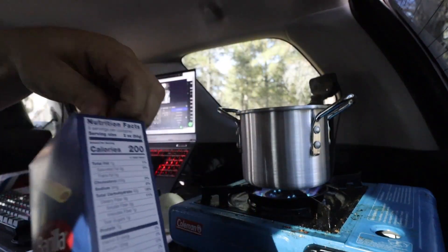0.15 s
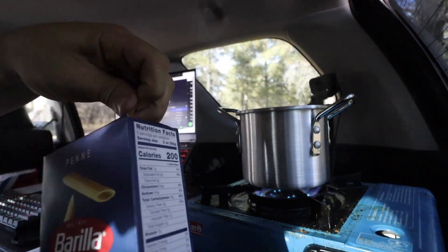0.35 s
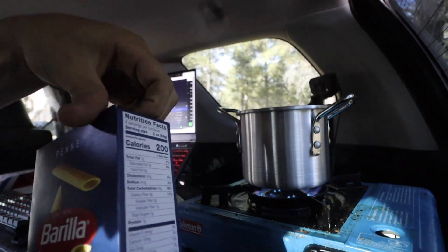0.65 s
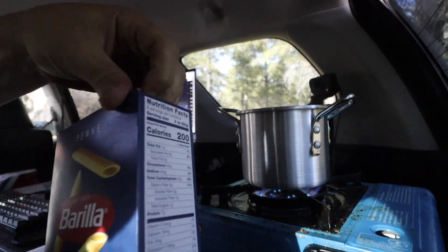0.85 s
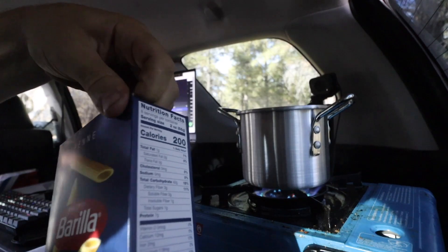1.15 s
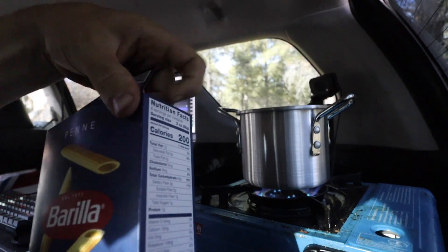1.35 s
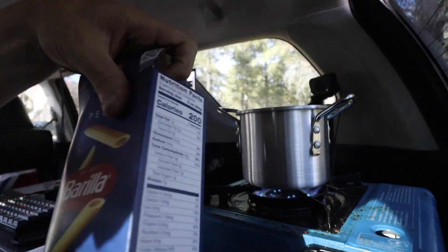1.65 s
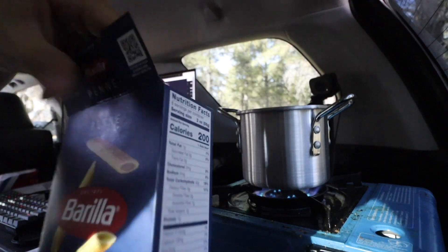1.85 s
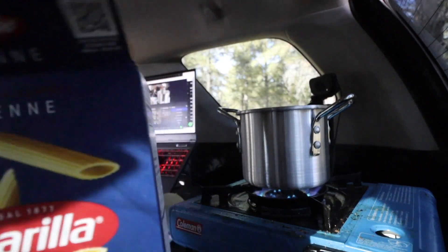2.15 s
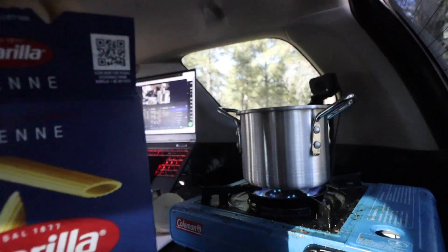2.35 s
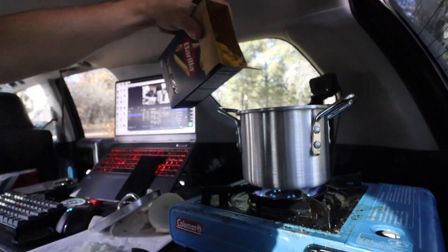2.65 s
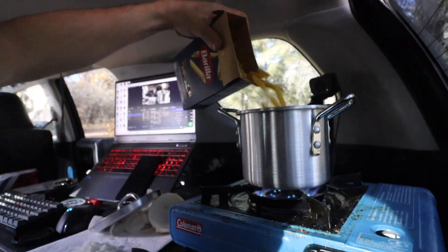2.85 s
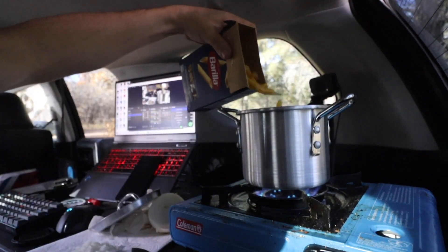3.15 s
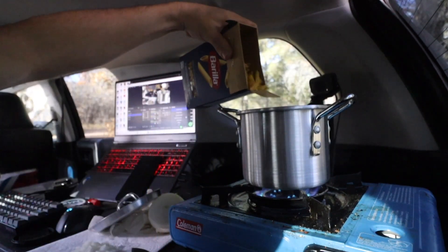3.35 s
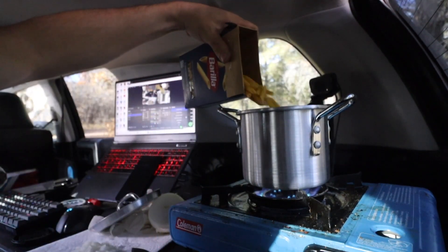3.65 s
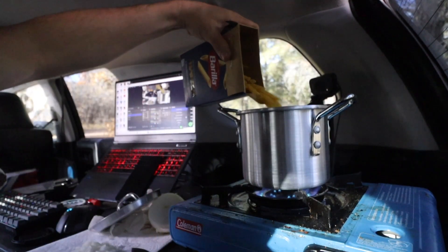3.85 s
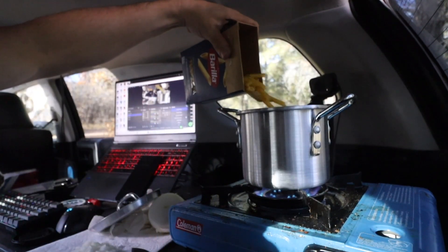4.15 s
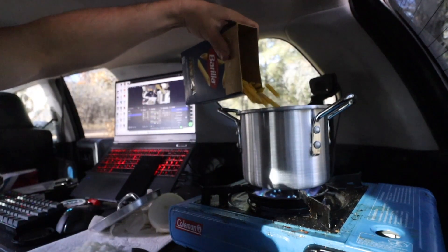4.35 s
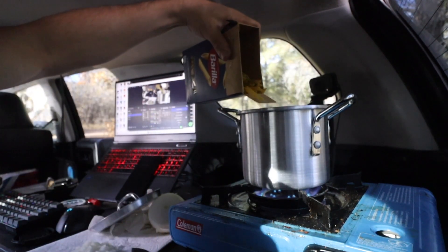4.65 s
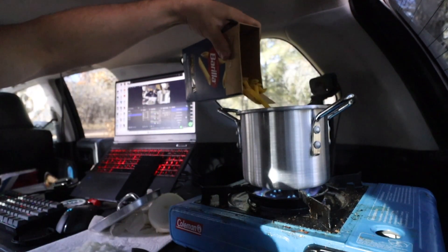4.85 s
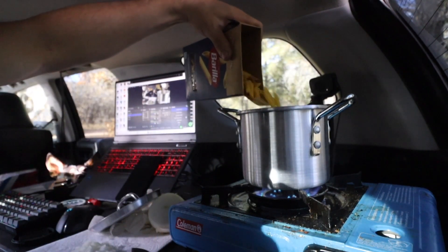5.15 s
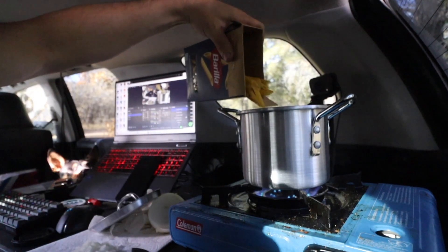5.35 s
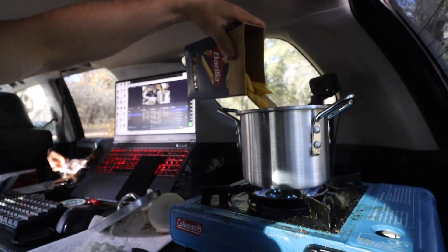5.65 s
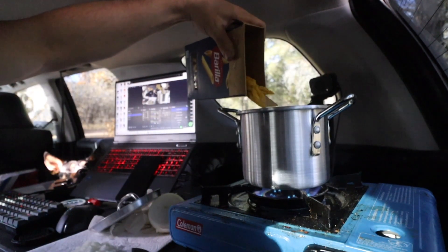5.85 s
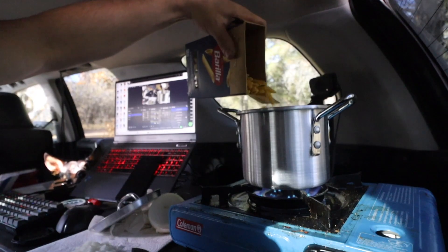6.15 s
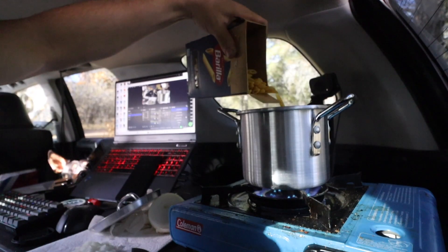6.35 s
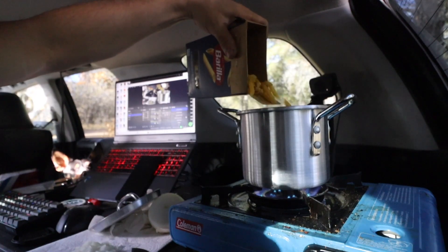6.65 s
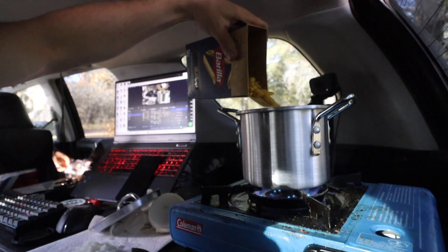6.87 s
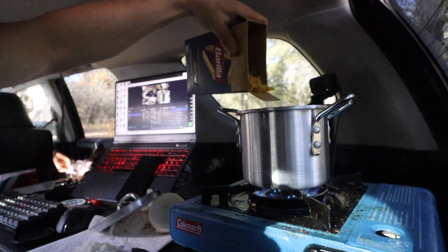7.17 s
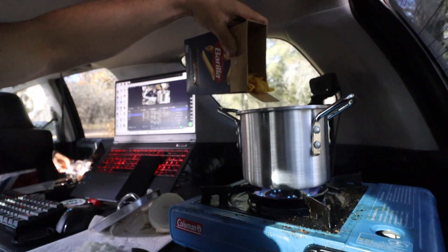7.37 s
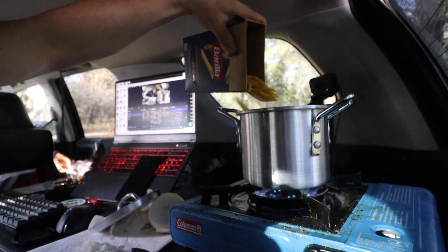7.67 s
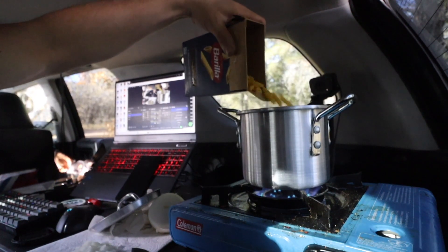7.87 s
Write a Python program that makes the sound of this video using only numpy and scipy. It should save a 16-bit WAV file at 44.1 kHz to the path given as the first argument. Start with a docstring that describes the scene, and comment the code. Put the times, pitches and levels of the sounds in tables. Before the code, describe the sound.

First comes loud, close handling of a card box: scuffs, crackly tears, crisp pops and boxy thuds. Then hard dry tubes pour in uneven surges, rattling and ticking, the box sounding more hollow as space opens, with small knocks and plops as pieces drop. The flow thins near the end, then surges again. Soft burner hiss and faint deep hum continue throughout in a dry, small car interior.

```python
"""A gas burner hisses under a pot and a low hum fills a parked car: noise and slowly wavering tones.
First a hand rubs, tears and snaps a cardboard box open: shaped noise coloured by the card and its walls.
Then dry pasta tubes slide out and click, drum on the box and drop: short decaying tones and noise puffs.
Soon after the tubes start, three blows ring the rim of the steel pot.
The padded cabin adds a short echo; the recorder turns down after loud sounds and rounds off the peaks."""
import sys
import numpy as np
from scipy import signal
from scipy.fft import rfft, irfft, next_fast_len
from scipy.io import wavfile
from scipy.ndimage import uniform_filter1d, map_coordinates

SR = 44100
rng = np.random.default_rng(int(sys.argv[2]) if len(sys.argv) > 2 else 0)


def generate_wav(signal):
    """Clip the signal to [-1, 1] and save it as 16-bit WAV at the path in sys.argv[1]."""
    frames = np.transpose(np.atleast_2d(signal))
    scaled = np.clip(frames, -1, 1) * 32767
    pcm = np.round(scaled).astype(np.int16)
    wavfile.write(sys.argv[1], SR, pcm)


N = 353241  # length in samples, about 8 s


def amp(db):
    """Turn decibels into a plain gain."""
    return 10 ** (np.asarray(db) / 20)


def unit(x):
    """Scale a sound to an rms of 1."""
    return x / np.sqrt(np.mean(x ** 2) + 1e-20)


def seconds():
    """The time of every sample."""
    return np.arange(N) / SR


def along(points, hz):
    """Read a curve of (pitch_hz, value) points, evenly spaced in octaves."""
    point_hz, value = np.transpose(points)
    return np.interp(np.log(hz + 1), np.log(point_hz + 1), value)


def wobble(rate):
    """A smooth random curve with this many random points a second."""
    points = rng.standard_normal(int(N * rate / SR) + 4)
    return map_coordinates(points, [np.arange(N) * rate / SR])


def filtered(x, response):
    """Change each frequency of x by a (possibly complex) response."""
    size = next_fast_len(N + SR // 2)
    return irfft(rfft(x, size) * response(np.fft.rfftfreq(size, 1 / SR)), size)[..., :N]


def colored_noise(points):
    """Steady noise with the colour of (pitch_hz, level_db) points, rms 1."""
    return unit(filtered(rng.standard_normal(N), lambda hz: amp(along(points, hz))))


def colored(x, points):
    """Colour x as a struck surface would: the filter starts at once (minimum phase) and has energy 1."""
    size = 2048
    log_gain = np.log(amp(along(points, np.fft.rfftfreq(size, 1 / SR))) + 1e-5)
    cepstrum = irfft(log_gain)
    # folding the second half onto the first leaves nothing before the start
    cepstrum = cepstrum * np.r_[1, 2 * np.ones(size // 2 - 1), 1, np.zeros(size // 2 - 1)]
    h = irfft(np.exp(rfft(cepstrum)))
    return signal.fftconvolve(x, h / np.linalg.norm(h))[:N]


def grit(rate, spread_db, bed):
    """Random contacts, rate a second and of uneven strength, over a share of smooth noise; rms 1."""
    strength = amp(spread_db * np.clip(rng.standard_normal(N), -2, 2))
    hits = (rng.random(N) < rate / SR) * strength * rng.standard_normal(N)
    return unit(unit(hits) + bed * rng.standard_normal(N))


def placed(times, rows):
    """Add up short sounds, one row each, starting at their times."""
    at = np.round(times * SR).astype(int)[:, None] + np.arange(rows.shape[1])
    return np.bincount(at.ravel(), rows.ravel(), N + SR)[:N]


def bursts(times, level_db, t60, rise):
    """A puff of noise at each time: it rises in about rise seconds and falls 60 dB in t60 seconds."""
    t = np.arange(SR // 8) / SR
    shape = amp(-60 * t / t60) * (1 - np.exp(-t / rise))
    noise = rng.standard_normal((len(times), len(t)))
    return placed(times, amp(level_db)[:, None] * shape / shape.max() * noise)


def bright_edge(x):
    """The sample-to-sample change, which favours the treble."""
    return np.diff(x, prepend=0)


def tones(times, level_db, hz, t60):
    """One fading tone at each time, each at its own pitch."""
    t = np.arange(SR // 20) / SR
    fade = amp(level_db[:, None] - 60 * t / t60)
    return placed(times, fade * np.sin(2 * np.pi * hz[:, None] * t))


def blows(times, level_db, modes, detune, scatter_db, size):
    """Blows that ring several fading tones; each tone's pitch and strength vary from blow to blow."""
    t = np.arange(size) / SR
    draw = rng.standard_normal((len(times), len(modes), 2))
    rows = 0
    for k, (hz, db, t60) in enumerate(modes):
        fade = amp(db + scatter_db * draw[:, k, :1] - 60 * t / t60)
        pitch = hz * np.exp(detune * draw[:, k, 1:])
        rows = rows + fade * np.sin(2 * np.pi * pitch * t)
    return placed(times, amp(level_db)[:, None] * rows)


# Colour of the burner's hiss: pitch_hz, level_db (per Hz, relative)
BURNER_COLOR = [(120, -50), (200, -3), (409, -3), (696, -1), (777, -1.5), (2290, -8), (6280, -18.5),
                (8740, -17), (13300, -30), (16000, -35)]


def burner():
    """Gas rushing out of the burner makes a hiss whose level wavers a little."""
    waver_db = 1.5 * wobble(3.75)
    return amp(-37.0 + waver_db) * colored_noise(BURNER_COLOR)


# Low hum and the air rumble that comes with it: time_s, hum_level_db, rumble_level_db (before wavering)
HUM_LEVELS = [(0, -45.5, -51), (2.6, -46.5, -40.5), (3, -47.5, -48), (4.6, -51.5, -50), (5.1, -46.5, -44),
              (6.3, -42.5, -46), (7.3, -41.5, -44), (7.6, -44, -42)]
# Colour of the air rumble: pitch_hz, level_db (per Hz, relative)
RUMBLE_COLOR = [(30, -20), (52, -5.5), (120, 3.5), (240, -3.5), (420, -30)]


def hum_and_rumble():
    """An unsteady low tone and a tone at three times its pitch, with a rumble of air noise."""
    time_s, *columns = np.transpose(HUM_LEVELS)
    hum_db, rumble_db = (np.interp(seconds(), time_s, c) for c in columns)
    pitch_hz = 38.6 + 0.6 * wobble(4.54)
    phase = 2 * np.pi * np.cumsum(pitch_hz) / SR
    # the higher tone fades faster than the hum
    third_db = -12.5 + 1.4 * (hum_db - hum_db.max()) + 3 * wobble(4)
    third = amp(third_db) * np.sin(3 * phase)
    hum = amp(hum_db + 0.65 * wobble(5.4)) * np.sqrt(2) * (np.sin(phase) + third)
    return hum + amp(rumble_db + 3.3 * wobble(6.2)) * colored_noise(RUMBLE_COLOR)


# How fast the cabin's echo dies away: pitch_hz, t60_s (time to fall 60 dB)
CABIN_DECAY = [(200, 0.12), (2000, 0.092), (12000, 0.085)]


def cabin(x):
    """The short echo of a padded cabin: fading noise, drawn anew every eighth of a second."""
    out, step = np.zeros(N + SR), SR // 8
    for at in range(0, N, step):
        hz, t, noise = signal.stft(rng.standard_normal(SR // 6), SR, nperseg=128)
        fade = amp(-60 * t / along(CABIN_DECAY, hz)[:, None])
        tail = signal.istft(noise * fade, SR, nperseg=128)[1]
        echo = signal.fftconvolve(x[at:at + step], tail / np.linalg.norm(tail))
        out[at + 60:][:len(echo)] += echo  # starts 60 samples late
    return out[:N]


# Colour of dry fibres cracking: pitch_hz, level_db (per Hz, relative)
CRACK_COLOR = [(1200, -15), (2000, -8.5), (3800, -0.5), (5900, 0), (8400, -3.5), (12500, -12), (16000, -15)]


def crackling(x):
    """Give x the bright colour of dry material cracking."""
    return colored(x, CRACK_COLOR)


def strokes(rows, pointed):
    """Gain of strokes that swell and fade; a larger pointed makes a sharper middle."""
    t, out = seconds(), 0
    for start_s, length_s, level_db in rows:
        progress = np.clip((t - start_s) / length_s, 0, 1)
        out = out + amp(level_db) * np.sin(np.pi * progress) ** pointed
    return out


# Fingers rubbing along the card: start_s, length_s, level_db (at the middle, before flutter and colour)
RUB_STROKES = [(.08, 0.18, -16), (.27, .1, -43), (.57, 0.084, -22.5), (.68, 0.075, -30.5),
               (1.16, 0.095, -37), (1.395, 0.11, -22), (1.48, .12, -23), (1.675, 0.13, -16),
               (1.79, 0.15, -19), (1.92, .12, -24), (2.135, 0.2, -23.5), (2.4, 0.22, -29.5)]
# Glued flaps tearing apart: start_s, length_s, level_db (at the middle, before flutter and colour)
TEAR_STROKES = [(0, 0.022, -31), (.355, .08, -25), (.43, 0.078, -40.5), (.935, 0.059, -30),
                (1.02, .067, -38), (1.085, 0.046, -23), (1.235, 0.082, -23), (1.30, 0.082, -33),
                (1.60, 0.093, -19), (2.515, 0.053, -34)]
# Card snapping: start_s, crack_level_db, wall_knock_level_db (before colour)
CARD_SNAPS = [(0.0857, -28, -23), (0.1446, -39, -7), (0.165, -39, -8.5), (0.1863, -41, -6.5),
              (0.2572, -5.5, -1), (0.2632, -14, -11), (.3775, -14, -42), (0.5563, -20, -27),
              (.6054, -37, -25), (0.786, -4, -7.5), (0.947, -35, -20.5), (0.9659, -17, -23),
              (0.9746, -8.5, -10.5), (0.9821, -8, -12.5), (1.088, -8.5, -19), (1.1128, -6, -33),
              (1.1172, 3.5, -3), (1.1359, -10, -8), (1.2627, -4, -2.5), (1.2744, -7, -10.5),
              (1.3045, -10, -3.5), (1.3274, -16, -22), (1.4101, -29, -14.5), (1.4432, -14.5, -36),
              (1.6372, -7, -4), (1.6455, -1.5, -3), (1.709, -12.5, -5), (1.7697, -22, -11),
              (1.823, -30, -17), (1.8532, -22, -7), (1.9044, -25, -12), (1.9959, -43, -16), (2.034, -25, 0),
              (2.141, -29.5, -18), (2.192, -21, -33), (2.2613, -40, -17), (2.358, -23, -25),
              (2.384, -14, -6), (2.4206, -32, -10.5), (2.5433, -1.5, 1)]
# Blows that flex the whole box: start_s, level_db (before colour)
BOX_THUMPS = [(0.376, -25.5), (.6054, -27), (0.7032, -20), (1.2611, -12.5), (1.8532, -36), (1.9043, -26),
              (1.9966, -19.5), (2.034, -6.5), (2.1925, -23), (2.262, -13), (2.279, -26), (2.384, -11.5),
              (2.4207, -18)]
# Colour of the closed box walls: pitch_hz, level_db (per Hz, relative)
WALL_COLOR = [(120, -28.5), (350, -4.5), (600, -8), (950, -2), (1700, -4.5), (3000, -16), (5000, -29),
              (12000, -70)]
# Colour of the whole box flexing: pitch_hz, level_db (per Hz, relative)
THUD_COLOR = [(70, -26), (130, -9), (280, 7.5), (450, -5), (900, -46.5)]


def card():
    """Rubbing drums the box walls, tearing crackles, and each snap cracks, knocks and thuds at once."""
    rubs, tears = strokes(RUB_STROKES, pointed=0.59), strokes(TEAR_STROKES, pointed=0.89)
    # faint, uneven rubbing of the hand on the box goes on until 3.4 s, under the first tubes
    rubs = rubs + amp(-43.5 + wobble(13)) * (seconds() < 3.4)
    # a tear also drums the walls, and a rub also crackles
    rub_gain = (rubs + tears) * amp(1.85 * wobble(60))
    tear_gain = (tears + amp(-18) * rubs) * amp(3.5 * wobble(90))
    rub = rub_gain * grit(800, spread_db=3.0, bed=0.5)
    tear = tear_gain * grit(2000, spread_db=6.5, bed=0.5)

    snap_s, crack_db, knock_db = np.transpose(CARD_SNAPS)
    thump_s, thump_db = np.transpose(BOX_THUMPS)
    knocks = bursts(snap_s, knock_db, t60=0.022, rise=0.0011)
    cracks = bursts(snap_s, crack_db, t60=0.016, rise=0.00035)
    thud_s, thud_db = np.r_[snap_s, thump_s], np.r_[knock_db - 28, thump_db]
    thuds = bursts(thud_s, thud_db, t60=0.028, rise=0.0021)
    edges = bright_edge(bursts(snap_s, crack_db - 18, t60=0.0027, rise=0.0001))

    walls = colored(rub + knocks, WALL_COLOR)
    flexing = colored(amp(-15.5) * rub + thuds, THUD_COLOR)
    return walls + crackling(tear + cracks) + edges + flexing


def resonances(modes):
    """Response of air that rings at several pitches, with alternating signs."""
    def response(f):
        total = 0
        for k, (center, width, db) in enumerate(modes):
            peak = 1j * f * width / (center * center - f * f + 1j * f * width)
            total = total + (-1) ** k * amp(db) * peak
        return total
    return response


# Air in the packed box, less of it and so higher: pitch_hz, width_hz, level_db
PACKED_AIR = [(920, 115, 0.5), (1450, 520, -3.5), (2580, 210, -7)]
# Air in the box once space has opened up: pitch_hz, width_hz, level_db
OPEN_AIR = [(305, 340, -7.5), (685, 97, 3), (997, 310, -4.5), (1924, 390, -2.5), (2680, 620, -7)]
# When the air space opens up: start_s, end_s
OPENING_TIMES = (2.87, 3.83)


def box_air(x):
    """Air in the box rings, blending to lower pitches as tubes leave; a small box gives off little bass."""
    empty = np.interp(seconds(), OPENING_TIMES, [0, 1])
    x = filtered(x, lambda hz: 1j * hz / (250 + 1j * hz))  # less bass below 250 Hz
    packed = filtered(x, resonances(PACKED_AIR))
    return (1 - empty) * packed + empty * filtered(x, resonances(OPEN_AIR))


# Ringing of one dry tube: pitch_hz, level_db, t60_s (before each blow's variation)
TUBE_MODES = [(3400, -1.5, 0.0069), (4100, -11.5, 0.0054), (5284, -5, 0.017), (7350, -9, 0.011),
              (8320, -2.5, 0.0088), (11200, -20, 0.012), (11420, -13, 0.019)]


def tube_blows(times, level_db, detune, scatter_db=4, size=512):
    """Struck dry tubes ring briefly at several pitches, a little different for each blow."""
    return blows(times, level_db, TUBE_MODES, detune, scatter_db, size)


# Pasta sliding out: time_s, level_db (drumming on the box, before surges and flutter)
PASTA_FLOW = [(2.6, -46), (2.63, -25.5), (2.89, -26), (3.2, -31), (3.5, -29), (3.76, -26), (3.86, -22),
              (4.05, -27), (4.41, -29), (4.89, -33.5), (5.2, -25), (5.46, -25.5), (5.92, -28.5), (6.3, -34),
              (6.52, -31.5), (6.8, -25.5), (6.99, -30), (7.06, -40.5), (7.5, -40), (7.7, -22.5),
              (8.01, -30.5)]


def rattle():
    """Many tubes of slightly different size click, scrape and drum as they slide."""
    flow_s, flow_db = np.transpose(PASTA_FLOW)
    drum_db = np.interp(seconds(), flow_s, flow_db, left=-120, right=-120)
    clatter_db = -28 + 1.46 * (drum_db + 24)  # swings wider than the drumming
    surge = wobble(22)  # tubes come in little slides

    when, luck = rng.uniform(flow_s[0], N / SR, size=4500), rng.exponential(size=4500)
    small = tube_blows(when, 3.7 * np.minimum(luck, 4), detune=0.112, scatter_db=6.5, size=256)
    # fewer, nearer tubes with a bright edge
    when, luck = rng.uniform(flow_s[0], N / SR, size=260), rng.exponential(size=260)
    near_db = 4 * np.minimum(luck, 3)
    edges = bright_edge(bursts(when, near_db, t60=0.0079, rise=0.0001))
    ticks = unit(tube_blows(when, near_db, detune=0.057)) + amp(-13.5) * unit(edges)

    slide = crackling(grit(900, spread_db=6.5, bed=0.63))
    drum = unit(box_air(grit(800, spread_db=2.0, bed=0.88)))
    clatter = unit(small) + amp(-0.5) * ticks + amp(-4.5) * slide
    drum_gain = amp(drum_db + 1.2 * surge + 2.2 * wobble(35))
    return amp(clatter_db + 2.2 * surge) * clatter + drum_gain * drum


# Tubes dropping against the box or into the water, dull knocks: start_s, level_db (relative), plop_pitch_hz
TUBE_DROPS = [(2.709, 1, 867), (2.744, -6.5, 890), (2.8, -5, 950), (2.843, -4.5, 860), (3.137, -10, 970),
              (3.205, -11, 1300), (3.324, -3.5, 1830), (3.635, -15.5, 1363), (3.883, -11, 1950),
              (3.941, -8, 655), (4.467, -10, 710), (4.994, -8.5, 687), (5.523, -7.5, 2000), (5.6, -6, 705),
              (5.81, -14, 1930), (5.826, -11, 2070), (6.01, -13, 813), (6.206, -13, 710), (6.684, -13, 904),
              (6.698, -9.5, 700), (6.774, -16, 670), (6.791, -8, 1920), (6.933, -4.5, 654),
              (7.105, -20, 686), (7.15, -15.5, 680), (7.262, -15, 710), (7.32, -17.5, 690),
              (7.5, -11.5, 685), (7.654, -6.5, 2030), (7.888, -9, 727)]


def drops():
    """A dropping tube knocks the air in the box and plops with one short fading tone."""
    drop_s, drop_db, plop_hz = np.transpose(TUBE_DROPS)
    knocks = box_air(bursts(drop_s, drop_db + 2.0, t60=0.054, rise=0.0013))
    return knocks + tones(drop_s, drop_db - 7.0, plop_hz, t60=0.037)


# Tubes striking the pot rim: start_s, level_db (relative)
RIM_STRIKES = [(2.8521, -5), (2.8734, -3), (3.1842, -11)]
# Ringing of the steel rim: pitch_hz, level_db, t60_s (before each blow's variation)
RIM_RINGING = [(4400, 0, 0.045), (4690, -5, .03), (5240, -3, .025)]


def pot_rim():
    """A tube striking the steel rim rings it at a few high pitches."""
    rim_s, rim_db = np.transpose(RIM_STRIKES)
    return blows(rim_s, rim_db, RIM_RINGING, detune=0.0051, scatter_db=3.5, size=6000)


# Loud tube clicks: start_s, level_db (relative), main_ring_pitch_hz
LOUD_CLICKS = [(2.6523, -6, 3030), (2.6932, -11.5, 9000), (2.7102, -5.5, 2980), (2.7999, -6, 8500),
               (2.851, -3, 4450), (2.8741, 10.5, 4470), (2.9456, -4, 7100), (3.0015, 6.5, 5240),
               (3.0404, 2.5, 7220), (3.082, -8, 7830), (3.1005, -5.5, 7140), (3.1821, 4, 4560),
               (3.206, 4, 5060), (3.3232, -15, 3230), (3.3447, 3, 5570), (3.373, -5, 5100),
               (3.3941, -3, 5000), (3.4066, 2.5, 5730), (3.6358, -5.5, 3800), (3.701, -6, 8040),
               (3.7518, -3, 5500), (3.885, 1.5, 5380), (3.9325, 4, 5580), (3.9952, -7, 5160),
               (4.0535, -7, 5300), (4.072, -1.5, 5360), (4.1368, -4.5, 5600), (4.2324, -6, 8800),
               (4.4655, -5, 5100), (4.4983, 2.5, 5370), (4.8876, -12.5, 9840), (5.0763, 1, 5280),
               (5.2212, -3.5, 5500), (5.277, -8, 5300), (5.3407, -0.5, 5370), (5.3754, -2.5, 5860),
               (5.423, 3.5, 5750), (5.4686, -4, 9000), (5.5624, -10, 3240), (5.614, -2.5, 3380),
               (5.8107, -6, 5400), (5.9228, -6.5, 3420), (5.9458, -0.5, 5470), (6.0301, -.5, 5200),
               (6.2202, -9.5, 7900), (6.2421, 2, 5900), (6.2595, 6.5, 5420), (6.6332, -3.5, 7520),
               (6.741, -2.5, 7200), (6.7926, -6.5, 3460), (6.9279, 2.5, 5540), (6.828, -6.5, 5300),
               (7.043, -18, 5200), (7.077, -18.5, 7000), (7.184, -10, 3430), (7.362, -24, 8500),
               (7.454, -22, 8600), (7.5635, -14.5, 3270), (7.616, -10, 5330), (7.6866, -6, 4400),
               (7.7307, 7.5, 4820), (7.7719, -1, 3100), (7.8772, -5, 7960), (7.9512, -8.5, 3540),
               (7.983, -6, 5000)]


def clicks():
    """Each loud tube contact cracks, rings, bounces once and knocks the air in the box."""
    click_s, click_db, main_hz = np.transpose(LOUD_CLICKS)
    draw = rng.random((len(click_s), 2))
    bounce_s = click_s + 0.0015 + 0.006 * draw[:, 0]
    bounce_db = click_db - 1.5 - 9 * draw[:, 1]
    both_s, both_db = np.r_[click_s, bounce_s], np.r_[click_db, bounce_db]

    cracks = bursts(both_s, both_db - 11, t60=0.014, rise=0.00074)
    # a faint puff of noise starts 5 ms earlier, so the click begins softly
    lead_in = bursts(click_s - 0.005, click_db - 30.5, t60=0.042, rise=0.0028)
    ticks = bright_edge(bursts(both_s, both_db - 27, t60=0.0036, rise=0.0001))
    rings = tones(click_s, click_db - 6.5, main_hz, t60=0.015)
    rings = rings + tube_blows(both_s, both_db - 15.0, detune=0.038)
    # the knock follows the drumming of the moment
    knock_db = np.interp(click_s, *np.transpose(PASTA_FLOW)) + 19.5
    knock_db = knock_db + 3.5 * rng.standard_normal(len(click_s))
    knocks = box_air(bursts(click_s, knock_db, t60=0.035, rise=0.00081))
    return crackling(cracks + lead_in) + ticks + rings + knocks


def scene():
    """Card and pasta sound near by and echo in the cabin, over the burner, hum and rumble."""
    near = card() + rattle() + drops() + pot_rim() + clicks()
    return (near + amp(-7.0) * cabin(near) + burner() + hum_and_rumble())[None]


def record(dry):
    """The recorder turns down after loud sounds, rounds off peaks and cuts the top treble."""
    keep = np.exp(-1 / (0.066 * SR))  # remembers power for about 66 ms
    recent_power = signal.lfilter([1 - keep], [1, -keep], dry ** 2)
    recent_db = 10 * np.log10(recent_power + 1e-9)
    duck_db = uniform_filter1d(0.32 * np.maximum(recent_db + 25.0, 0), size=150)
    x = dry * amp(-duck_db)
    x = x / (1 + np.abs(x) ** 8) ** (1 / 8)  # peaks stay below full scale
    return filtered(x, lambda hz: 1 / (1 + (hz / 15750) ** 200))  # steep cut at 15750 Hz


dry = scene()
out = record(dry)
generate_wav(out)
```